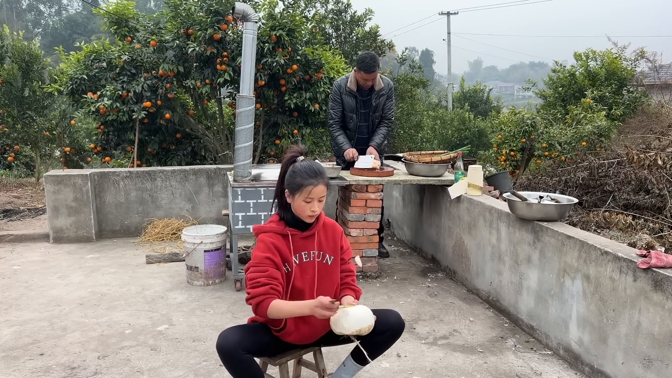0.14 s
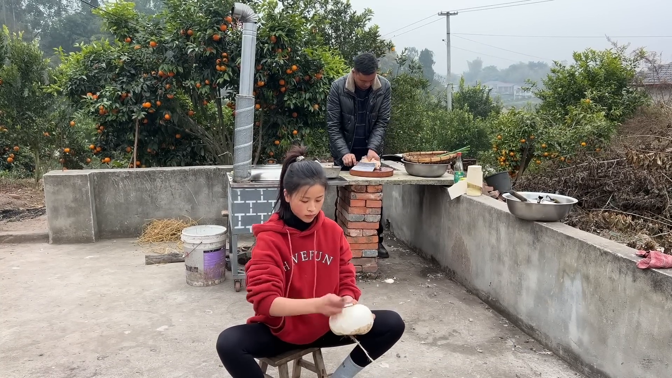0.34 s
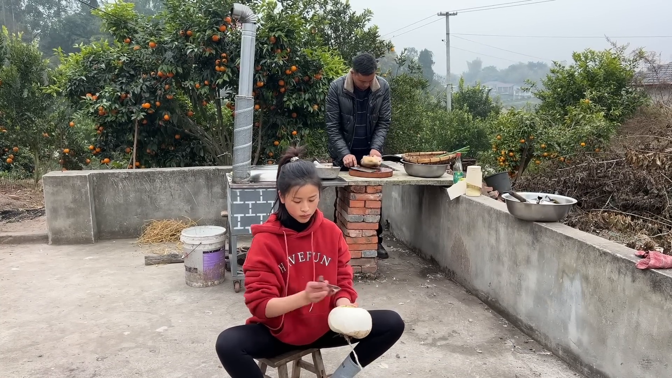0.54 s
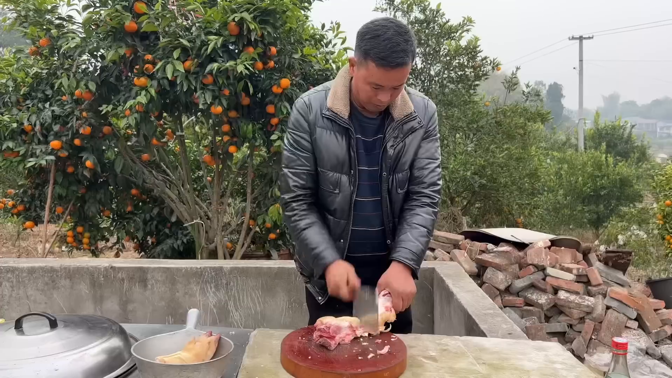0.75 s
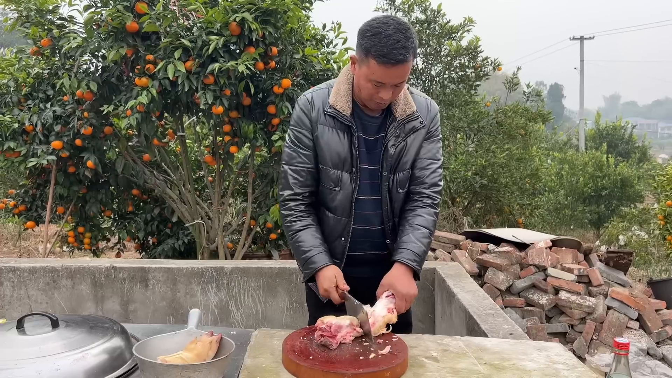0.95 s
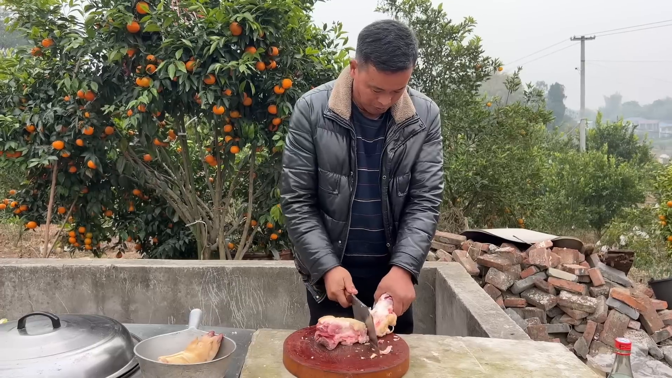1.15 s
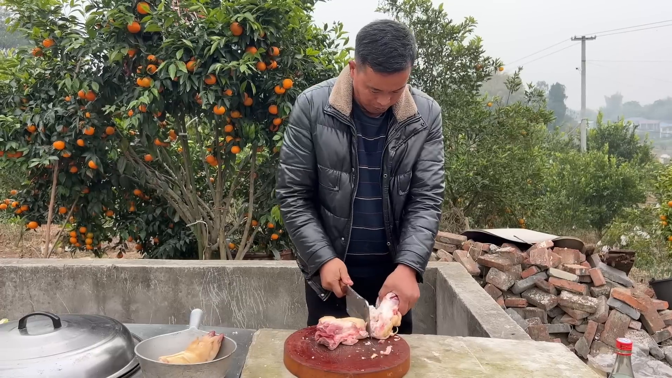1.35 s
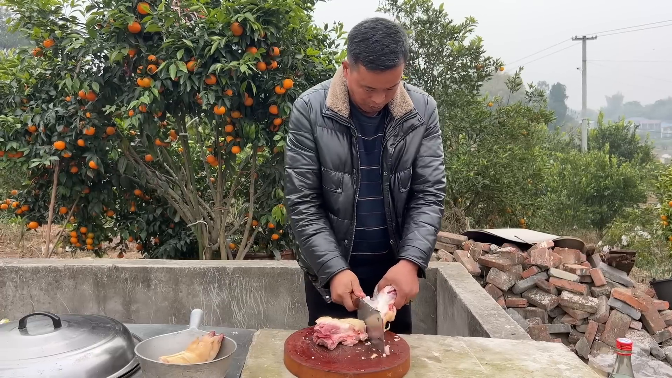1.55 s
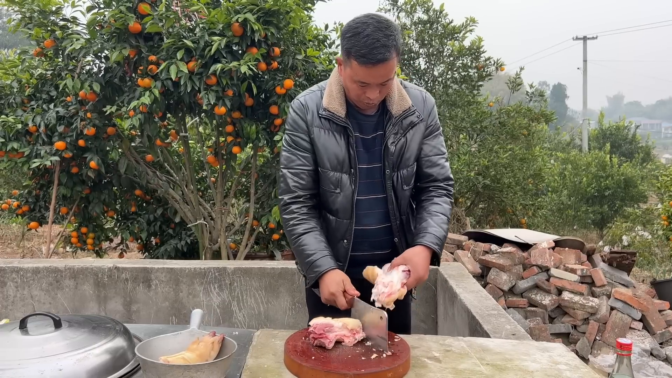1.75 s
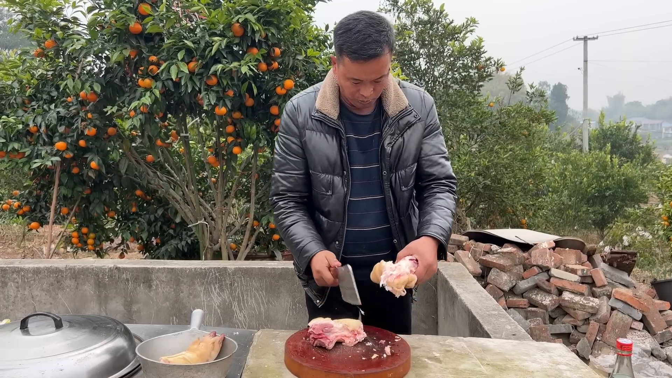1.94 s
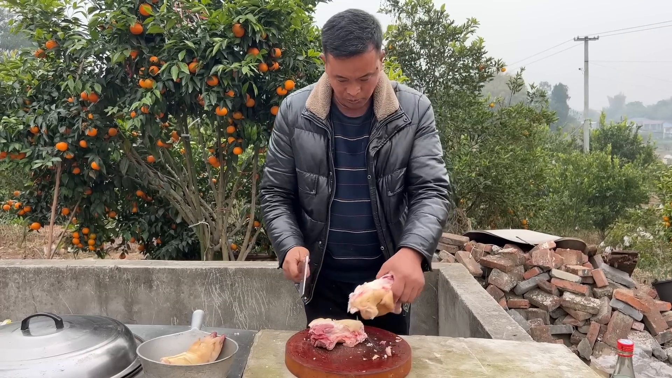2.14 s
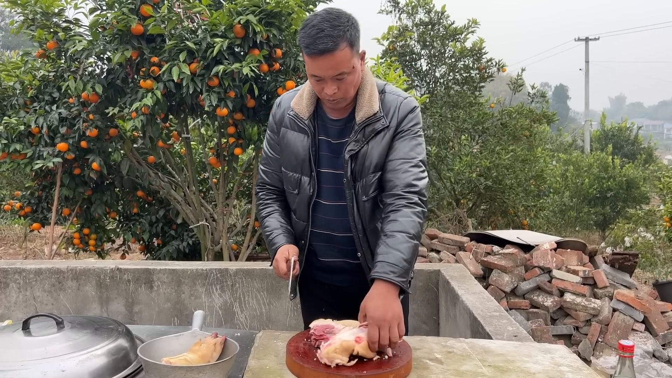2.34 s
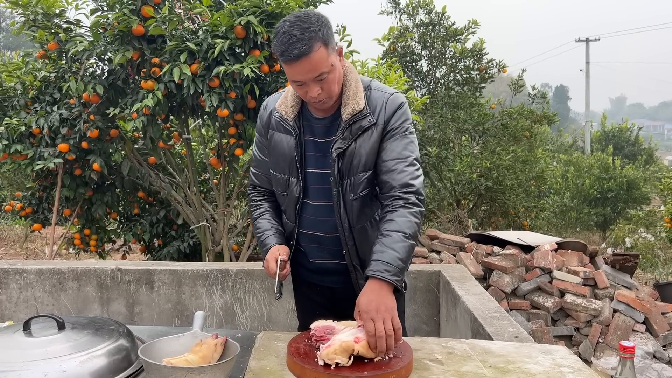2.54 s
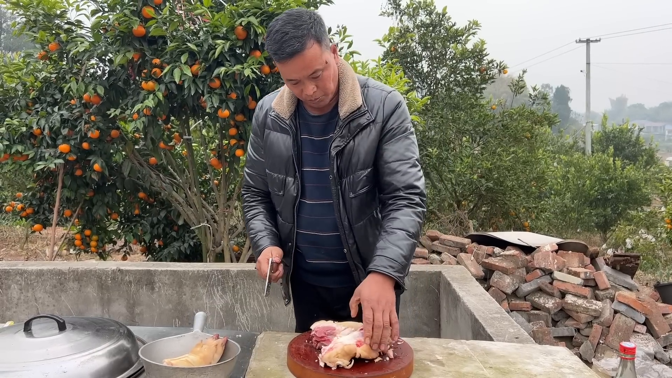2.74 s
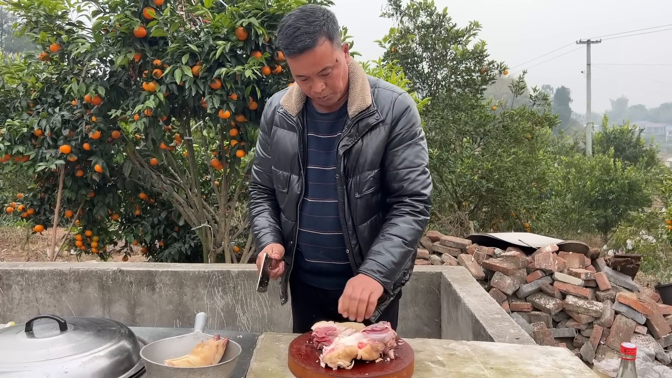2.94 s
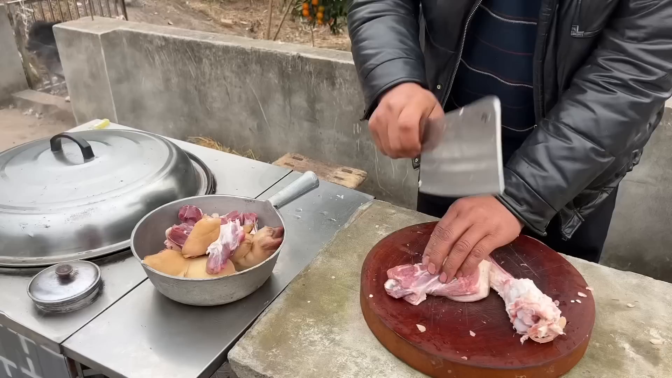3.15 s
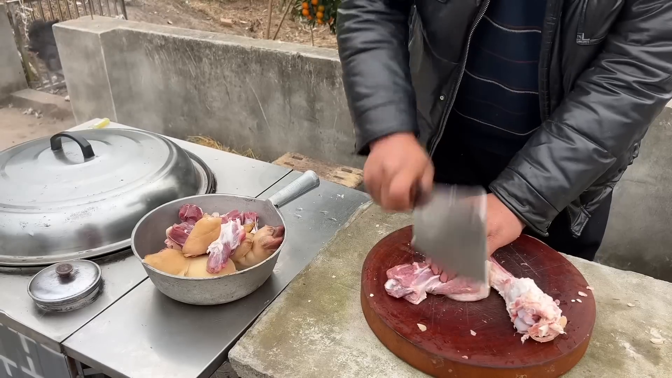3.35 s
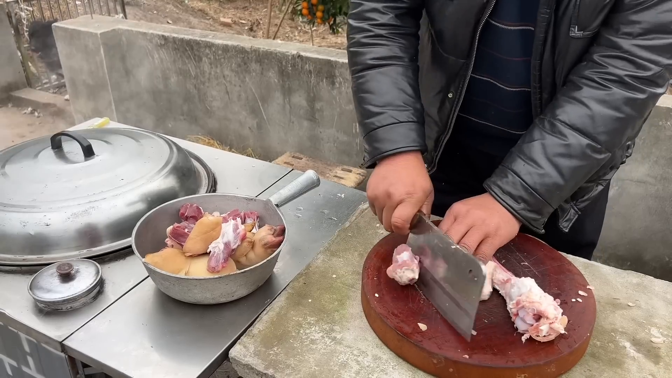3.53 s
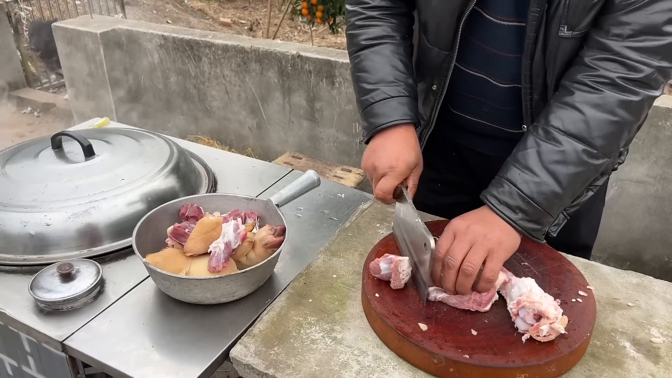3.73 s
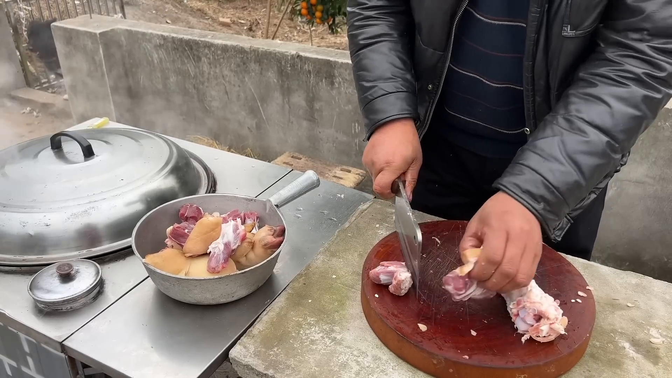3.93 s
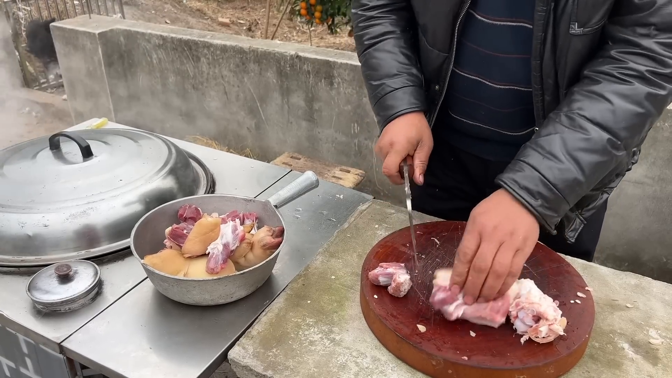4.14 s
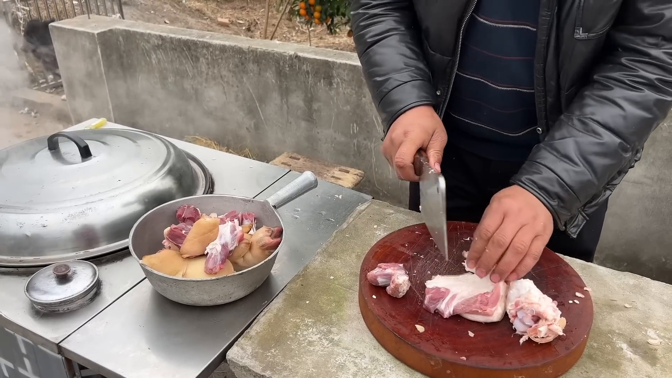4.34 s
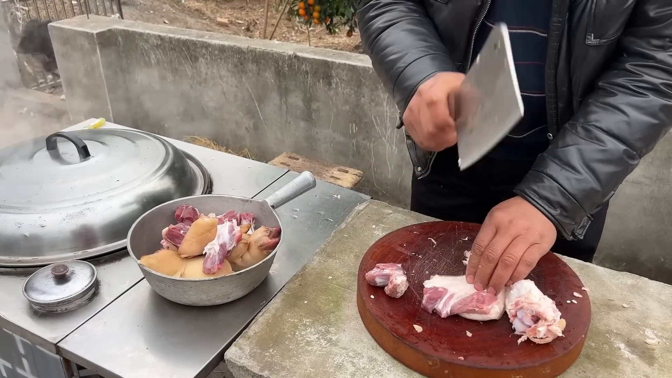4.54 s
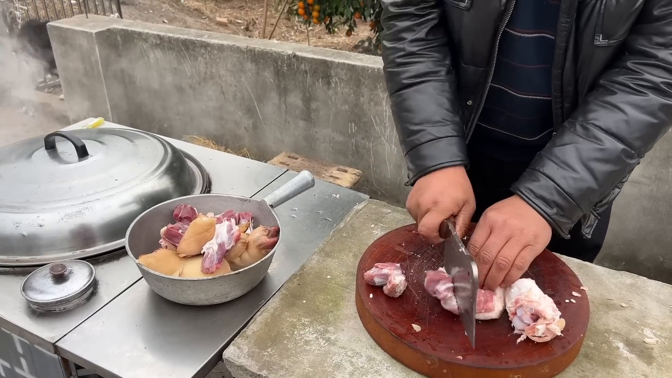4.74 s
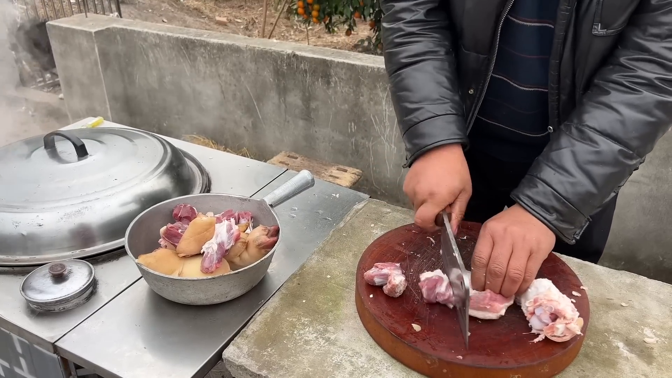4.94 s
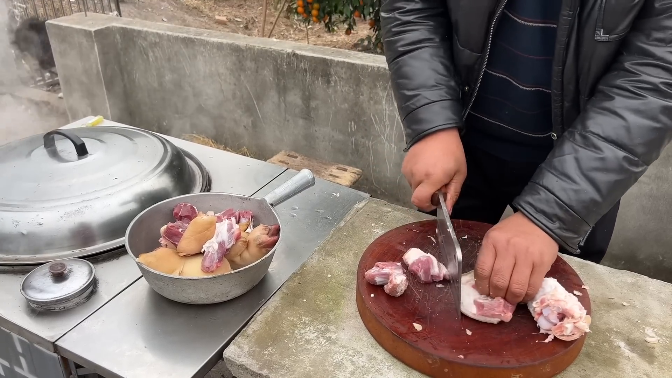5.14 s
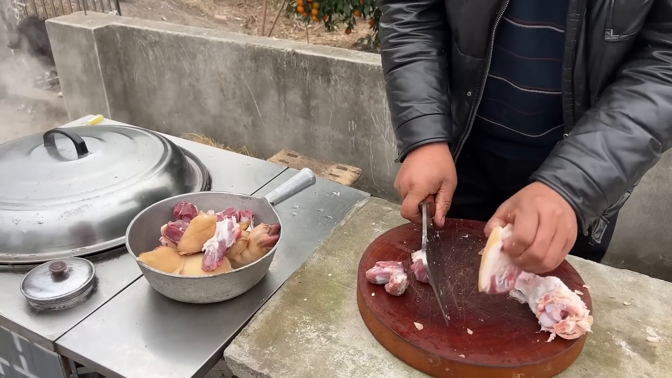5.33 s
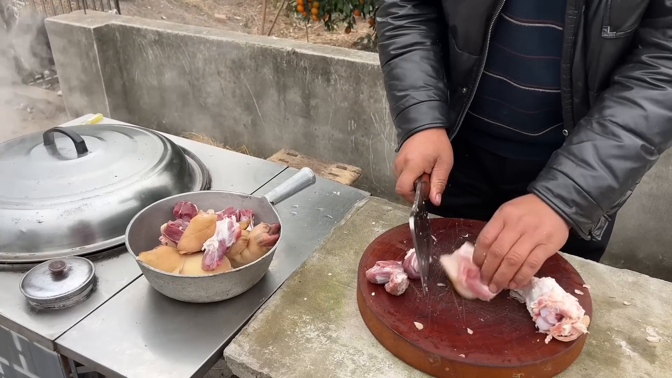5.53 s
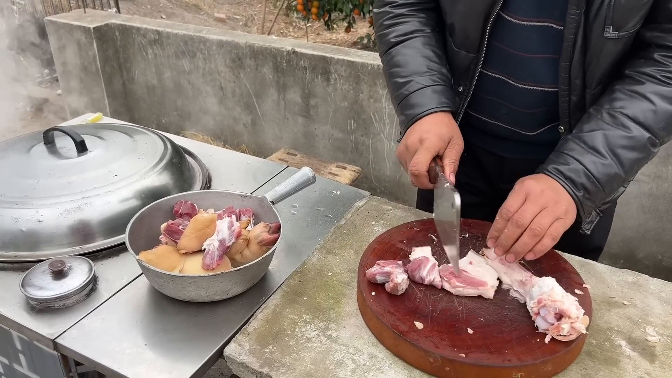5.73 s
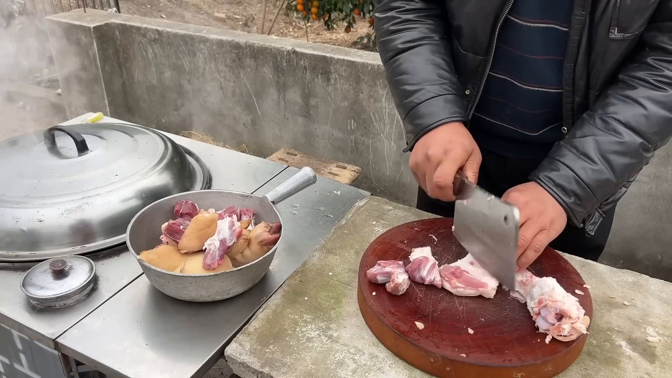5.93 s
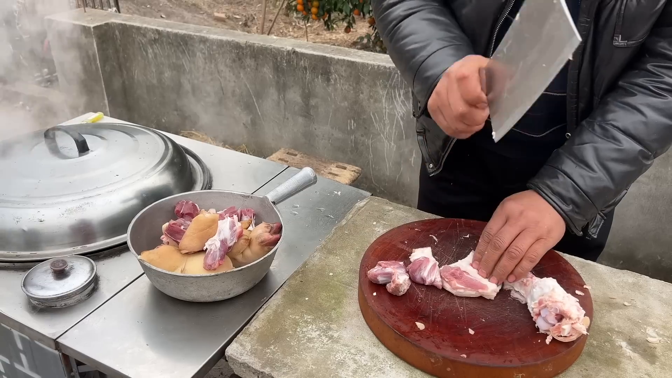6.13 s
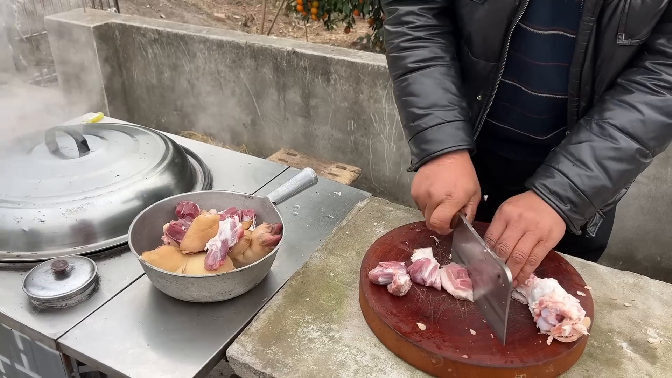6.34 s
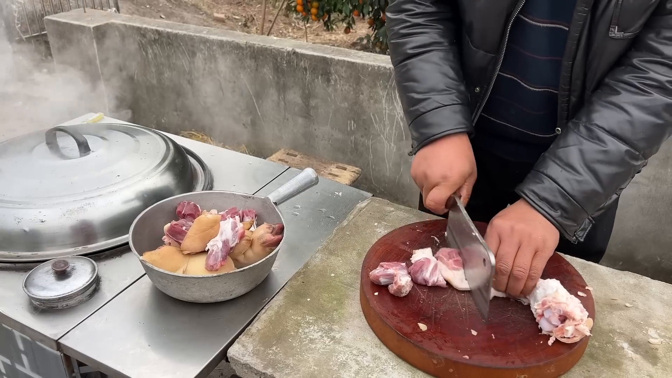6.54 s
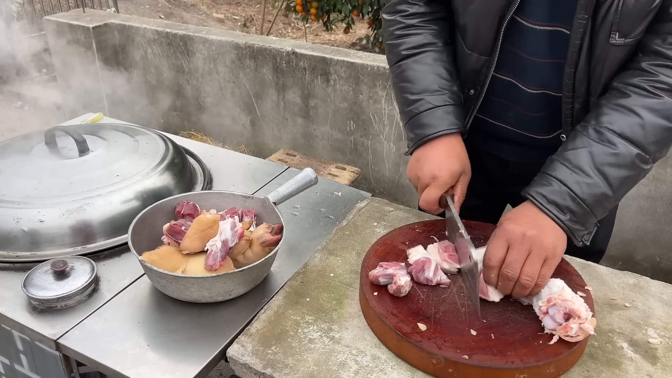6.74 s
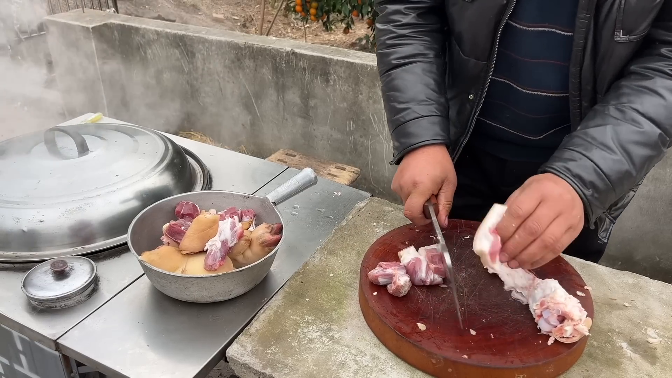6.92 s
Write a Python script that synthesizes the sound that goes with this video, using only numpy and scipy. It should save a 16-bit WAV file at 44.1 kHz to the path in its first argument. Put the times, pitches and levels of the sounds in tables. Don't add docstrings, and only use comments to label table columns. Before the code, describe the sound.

A walled yard outdoors, close stereo microphone, short scattered tail. From 0 to 0.73 s a low, wavering stove roar lies under thin, gritty paring strokes and small bright knife clinks; a far board knocks in quick bounces at 0.32, and a flat blade clatters loudly at 0.61 with fast, dry rebounds. An abrupt cut drops to quiet air. At 0.85 a cleaver cracks through bone: explosive, splintering, woody, with wet crunch and low table thump. Soft sleeve rustle and meat rubbing follow. A short high bird whistle falls at 2.29, just before a far weaker chop at 2.42. Another subtle cut comes at 3.2; the hardest, shortest blow lands at 3.43. A clear steel ping sounds at 4.12, a soft thud at 4.39, then full chops at 4.78, wetter, and 6.30. Faint squeaks, taps and rubbing continue to about 7 s.

```python
import sys
import numpy as np
from scipy import signal
from scipy.fft import rfft, irfft
from scipy.io import wavfile
from scipy.ndimage import uniform_filter1d

SR = 44100
rng = np.random.default_rng(int(sys.argv[2]) if len(sys.argv) > 2 else 0)


def materialize(psi):
    bounded = np.clip(np.atleast_2d(psi).T, -1, 1)
    quanta = np.round(bounded * 32767).astype(np.int16)
    wavfile.write(sys.argv[1], SR, quanta)


def ratio_of_db(decibels):
    return 10 ** (np.asarray(decibels, float) / 20)


N = 307818

# fade_out_end_s, fade_in_start_s
SCENE_CHANGES = [
    (.726, .744),
    (3.188, 3.205),
]

# start_s, level_db
STOVE_SPECTRUM = [(15, -61), (25, -25), (60, -7.5), (119, -10.5), (213, -4), (266, -6.5), (316, -19.5),
                  (444, -19), (519, -65), (1500, -60.5), (1950, -76), (3300, -120)]
STOVE_LEVEL = [
    (0.0, -43),
    (0.582, -44.5),
    (0.63, -40),
    (0.694, -45),
    (0.73, -45),
]
FLUE_HZ, FLUE_DB = 70, 2

# pitch_hz, density_db_per_hz
KNIFE_SPECTRUM = [(880, -55), (1500, -27), (2850, -18), (4850, 1), (5700, -8), (8860, -10), (9890, -53),
                  (11300, -5), (13900, -35), (15200, -8.5), (16000, -9), (16500, -38)]
# start_s, end_s, start_db, end_db
STROKES = [
    (0, 0.02, -44, -58),
    (0.075, 0.085, -55, -56),
    (0.117, 0.168, -78, -62),
    (0.17, 0.227, -52, -47.5),
    (0.388, 0.45, -54, -50),
    (0.464, 0.48, -51, -63),
    (0.606, 0.725, -48.5, -51),
]
# centre_s, half_width_s, level_db
CATCHES = [(0.018, .003, -46), (.085, 0.0024, -51.5), (.168, .002, -51), (0.1772, 0.0021, -34),
           (0.182, .001, -39), (.194, .0015, -43), (.2045, 0.0022, -45), (.215, 0.0026, -41),
           (0.226, 0.0018, -46), (.391, 0.0014, -37), (0.4, 0.0023, -32), (0.406, .002, -42),
           (.418, .002, -45), (0.431, 0.0016, -45), (.44, .003, -47), (.468, 0.0015, -49),
           (0.659, 0.0041, -34), (.721, 0.004, -39.5)]

# pitch_hz, level_db, t60_s
SMALL_KNIFE_MODES = [(3900, -12, .04), (4850, -1, .035), (5020, 0, .045), (6300, -9, .05), (7200, -14, .03),
                     (11300, -10, .03)]
FLAT_BLADE_MODES = [(1680, -14, .07), (1975, -6, .04), (2975, 1, .03), (3255, -8, .08), (3530, -6, .12),
                    (3955, 3, .16), (4278, -11, .2), (5030, -6, .14), (5510, -3, .1), (6250, -8, .03),
                    (6807, -9, .12), (7950, -3, .025)]
HELD_BLADE_MODES = [(1653, -3, .16), (1960, 0, .15), (2692, -20, .2), (3300, -6, .06), (3962, -20, .25),
                    (5039, -6, .32), (5523, -9, .28), (7311, -8, .05), (9044, -5, .12), (11340, -1, .1),
                    (12060, -4, .06), (12630, -6, .07)]
# pitch_hz, level_db, t60_s
BOARD_MODES = [(705, 0.5, 0.075), (1000, -1.5, 0.074), (1666, 0, .16), (2733, -8.5, 0.085),
               (3337, -2, 0.05), (3933, -2, 0.12)]
# pitch_hz, level_db
TICK_SPECTRUM = [(300, -11), (700, -6), (2000, -1), (5000, 4), (9000, -13.5), (10200, -26), (11500, -11.5),
                 (15000, -25.5)]
# start_s, level_db, dry_tick_db
CLINKS = [
    (0.0144, -26.5, -37),
    (0.0837, -39, -5),
    (0.1231, -49, -1),
    (0.1773, -33, -7),
    (0.2129, -36, -21),
    (0.2264, -31, -20),
    (0.396, -25.5, -11.5),
    (0.4672, -38.5, -11),
    (0.4855, -43.5, -13),
    (0.7195, -30, -10),
]
CLATTER = [
    (0.321, -30, -14),
    (0.6136, -7.5, -3.5),
    (.636, -17, 2.5),
    (0.6556, -22.5, 11.5),
    (0.668, -26.5, 12),
    (.688, -39, 13),
    (1.538, -47, -10),
    (1.574, -45, -5),
    (1.809, -50, -14.5),
]
PINGS = [
    (4.083, -58, -4),
    (4.1165, -28, -5),
    (4.224, -62, 0),
]
FAR_KNOCKS = [
    (.3165, -28.5, -4),
    (.327, -29.5, -3),
    (.339, -31, -5),
]

# start_s, peak_db, centre_hz, left_right_db
TAPS = [(0.2707, -44, 1740, 1), (0.3431, -35, 2750, 3.5), (1.2073, -51, 1640, 4), (2.0797, -42, 5200, 0),
        (2.374, -42, 3300, 2), (2.372, -48, 6200, 0), (2.91, -49, 2440, 9), (3.2185, -41, 926, 4),
        (3.5364, -46, 1290, 10), (4.4136, -49.5, 2880, 4.5), (4.4917, -45.5, 5530, .5),
        (4.6843, -52.5, 1720, 13.5), (4.862, -49, 1110, .5), (5.6, -52, 1900, 1.5),
        (6.5905, -50.5, 2930, -10.5), (6.9064, -49, 3640, 7)]
# start_s, peak_db, centre_hz, left_right_db
THUDS = [
    (1.213, -43, 440, 4.5),
    (2.902, -47, 338, 3),
    (4.335, -53, 186.5, .5),
    (4.393, -34, 330, 7.5),
    (5.2, -42, 192, 3.5),
    (5.454, -45, 506, 6.5),
    (6.925, -56, 277, 2),
]
# start_s,
# peak_db, centre_hz, left_right_db
GRIT = [(0.605, -34, 2800, 2.5), (.628, -34, 1300, 2), (.643, -23, 2220, 2), (.651, -32, 1000, 0),
        (.66, -16, 4900, -0.5), (0.671, -24, 3400, 2.5), (.681, -40, 1500, 1.5), (.692, -33, 2600, 2),
        (.702, -41.5, 1290, 2), (.711, -38, 2300, 2), (.315, -31.5, 905, 1), (.332, -35, 740, 0.5),
        (.318, -31, 2280, 1.5), (0.326, -37.5, 1500, 0.5), (0.342, -33.5, 2600, 2), (0.639, -19, 3600, 1)]
# start_s, peak_db, centre_hz, left_right_db
CLICKS = [(.92, -49, 5500, 0), (3.4495, -20, 900, 1), (3.512, -46, 2500, 2), (4.0615, -50, 6000, -2),
          (4.1168, -30, 8000, -1), (4.1168, -37, 15000, -1), (4.1175, -30, 3400, -1),
          (4.216, -41, 1900, -4), (4.2245, -45, 11500, -1), (4.227, -46, 3300, -2), (5.1968, -35, 1600, 8),
          (5.1968, -35, 2800, 8), (5.403, -50, 2600, 2), (5.617, -47, 1700, 1.5), (5.619, -52, 3800, 1),
          (6.036, -56, 7500, 0), (6.685, -55, 4500, 0)]
TAP_T60, THUD_T60, CLICK_T60 = .05, .1, .018

# pitch_hz, t60_s
YARD_DECAY = [(60, 0.37), (200, 0.59), (500, 0.31), (1000, 0.14), (2500, 0.14), (5000, 0.15), (10000, 0.08)]

# start_s, length_s, rustle_db, rubbing_db
MOVES = [(.76, .08, -62, -66), (.87, .15, -58, -52), (1.03, .1, -63, -60), (1.17, .1, -62, -54),
         (1.34, .11, -61, -61), (1.51, .1, -59, -43.5), (1.76, .05, -65, -64), (2.04, .12, -64, -65),
         (2.34, .26, -62, -61), (2.62, .15, -65, -64), (2.88, .08, -70, -59), (3.18, .24, -60, -60),
         (3.62, .15, -66, -70), (4.02, .24, -64, -66), (4.39, .13, -61, -63), (4.53, .23, -63, -65),
         (4.94, .53, -57.5, -60), (5.5, .125, -60, -60), (5.68, .42, -70, -70), (6.13, .14, -62, -70),
         (6.5, .16, -59, -59), (6.71, .16, -63, -63), (6.88, .06, -55, -56)]
RISE_S, RELEASE_DB_PER_S, WAVER_DB = 0.054, 220.5, 2
RUMBLE_DB, RUMBLE_TOP_DB = -9.5, -60.5
# rustle_db, rubbing_db, rumble_db
REST_DB = (-74, -78, -68)
# rustle_db, rubbing_db, rumble_db
TOUCH_DB = (-56, -41, -55.5)
TOUCH_S = 0.013
# rustle_db, rubbing_db, rumble_db
SHUDDER_DB = (-46, -31, -24)
SHUDDER_S, SHUDDER_DB_PER_S = 0.052, 93.5
# pitch_hz, density_db_per_hz
RUSTLE_SPECTRUM = [(710, -34), (1200, -6.5), (1940, 0.5), (6860, -4.5), (9230, -11.5), (10200, -32.5),
                   (11400, -13.5), (13000, -20.5), (13700, -38), (15300, -12), (16500, -35.5)]
RUMBLE_SPECTRUM = [(15, -33.5), (25, -7), (53, 5.5), (102, -7), (139, -13.5), (194, -21), (300, -17),
                   (390, -39), (660, -120)]
# pitch_hz, level_db, t60_s
RUBBED_MODES = [(202, -0.5, 0.022), (300, 3, .018), (450, 3.5, .022), (620, -1.5, 0.011), (780, -2, 0.0096),
                (970, 0.5, .022), (1310, -4, .015), (1620, -2.5, .018), (2150, -6.5, .013),
                (2700, -5.5, .016), (3200, -11, .013), (4900, -13, .015), (5550, -14.5, .02)]
# centre_s, pitch_hz, level_db
SQUEAKS = [(.846, 2500, -47), (.94, 2750, -52), (.975, 1880, -54), (.975, 2600, -54), (1.21, 2700, -59),
           (1.22, 1650, -56), (1.397, 5960, -60), (1.555, 5550, -59), (2.375, 2000, -60),
           (2.376, 3020, -56), (2.378, 3450, -55), (2.411, 1650, -52), (2.51, 2750, -61), (2.7, 2900, -65),
           (3.68, 2050, -63), (3.696, 3440, -66), (3.76, 3040, -63), (4.098, 3960, -62), (4.52, 520, -61),
           (4.776, 3900, -56), (4.78, 1350, -43), (5.038, 5580, -62), (5.24, 1950, -59), (5.352, 3250, -59),
           (5.405, 480, -58), (5.435, 490, -60), (5.53, 460, -62), (5.585, 470, -61), (5.612, 490, -59),
           (6.292, 3100, -51), (6.294, 1400, -48), (6.543, 4750, -59), (6.545, 6100, -61),
           (6.605, 2980, -57), (6.618, 1980, -59), (6.77, 980, -62), (6.78, 1918, -62), (6.92, 940, -55),
           (6.92, 5600, -60), (6.94, 3950, -56), (6.942, 2650, -56)]
SQUEAK_S = .045

# start_s, force_db, splintering_s, flesh_crunch_db, table_thump_db
BLOWS = [
    (0.85, .5, .012, -29, -15),
    (2.4164, -22.5, 0.019, -34.5, -14),
    (3.433, 1.5, .0085, -24, -20),
    (4.7842, -0.5, .011, -20.5, -13),
    (6.301, 0.5, 0.01, -25.5, -14),
]
# pitch_hz, density_db_per_hz
BONE_SPECTRUM = [(120, -38), (250, -11), (700, -7), (1600, -8), (2700, -12.5), (4000, -24.5), (5600, -39),
                 (14000, -62)]
# pitch_hz, level_db
BONES = [
    (-0.16, [(430, -4), (690, -9), (900, 1), (1310, 8), (1700, 5.5), (1950, -8.5), (2700, 4), (2950, -10.5), (3250, 2.5), (3900, -17.5), (4700, 12)]),
    (-2.1, [(470, 6), (700, -9), (950, 5.5), (1220, 7.5), (1450, -3), (1700, 10), (2230, 3), (2600, -4), (3000, -4), (3500, -2), (4200, -8)]),
    (-.5, [(280, 9), (350, 4), (730, 4), (810, 6.5), (950, -2.5), (1180, -5.5), (1550, 2), (1730, -13), (2450, 6.5), (2750, -11.5), (3270, 6), (3550, -6.5), (3900, 7.5)]),
    (-1, [(260, -8), (305, -8), (400, 4.5), (700, -3.5), (1500, -3), (970, 3), (1150, -7.5), (1700, -8.5), (2050, 5), (2550, -7.5), (2950, 6), (3500, -8), (3950, 4), (4300, -6.5)]),
    (-0.66, [(420, 4), (780, 3.5), (1150, -4.5), (1310, -2.5), (1510, 0), (1750, -6.5), (2080, 5.5), (2600, -4.5), (2900, -5.5), (3500, -16), (3990, 3.5), (4500, -6.5)]),
]
RESONANCE_OCTAVES = 0.066
# delay_s, level_db
SECOND_CRACKS = [
    (.009, -12),
    (.012, -4),
    (.006, 0),
    (.011, -16),
    (.011, -7),
]
SECOND_S = 0.0013
FLESH_LEADS = [.0055, .004, .0075, .0045, .005]
BLOCK_FREEDOM = [1.5, 1.5, -3, 0, 0.5]
# pitch_hz, level_db, t60_s
BLOCK_MODES = [(310, -4, .08), (450, 0, 0.1), (605, -3, 0.058), (722, -6, 0.057), (812, -6.5, 0.068),
               (963, 3.5, 0.08), (1083, -8, 0.051), (1301, -6.5, 0.055), (1505, -4, .05),
               (1725, -2.5, 0.034), (1910, -3, 0.04), (2110, -7, .05), (2360, -5, .055), (2720, -7.5, 0.1),
               (3040, -9, 0.043), (3250, -9.5, 0.038)]
TABLE_MODES = [(55, -25, 0.2), (75, -14, 0.22), (110, 1.5, 0.13), (147, 5.5, .15), (190, 4.5, 0.17)]
BLOCK_DB, LIGHT_RING = -30.5, .15
DENSE_DB, DENSE_T60 = -14, .1
# pitch_hz, level_db
FLESH_SPECTRUM = [(600, -10.5), (1500, -6), (3500, -3.5), (8000, -5), (10300, -11), (11600, -2.5),
                  (13500, -14), (16000, -19.5)]
SPRAY_DB, SPRAY_DB_PER_S = -21.5, 200

# start_s, length_s, from_hz, to_hz, level_db
CHIRP = (2.289, .058, 7600, 7280, -37)
CHIRP_ECHO_DB, CHIRP_ECHO_T60 = -13, .4

# pitch_hz, density_db_per_hz
AIR_SPECTRUM = [(15, -34.5), (25, 0.5), (70, -5), (457, -7.5), (1150, -15), (1550, -13.5), (1980, -22.5),
                (6380, -20.5), (9080, -29.5), (10100, -53), (11600, -35), (13600, -55.5), (16500, -70)]
AIR_DB = -64.5
# pitch_hz, correlation
LIKENESS = [(60, 1), (180, 0.66), (550, 0.15), (1650, -0.15), (4970, -0.24), (15000, 0.79)]
# pitch_hz, level_db
HOUSING = [(8600, 0), (9400, -2), (10200, -6), (11000, 0.5), (12900, 0), (13800, -13), (14600, 0.5),
           (15800, -0.5)]


def evened(x):
    return x / np.sqrt(np.mean(x ** 2) + 1e-20)


def read(points, hz):
    f, value = np.transpose(points)
    return np.interp(np.log(hz + 1), np.log(f + 1), value)


def level(rows):
    return ratio_of_db(np.interp(np.arange(N) / SR, *np.transpose(rows)))


def add(mix, s, sound, pan_db=0., lag=0):
    era = int(s > SCENE_CHANGES[0][0])
    for side, shift, sign in ((0, 0, 0.62), (1, lag, -1.1)):
        part = mix[era, side, round(s * SR) + shift:][:len(sound)]
        part += ratio_of_db(sign * pan_db / 2) * sound[:len(part)]


def colour(points, size=2048):
    hz = abs(np.fft.fftfreq(size, 1 / SR))
    log_gain = np.log(ratio_of_db(np.maximum(read(points, hz), -90)))
    taps = np.fft.ifft(np.exp(np.conj(signal.hilbert(log_gain)))).real[:size // 2]
    return taps / np.linalg.norm(taps)


def ring(modes, spread_db, detune, size=13000):
    t = np.arange(size) / SR
    out = np.zeros(size)
    for hz, db, t60 in modes:
        strike, shift = rng.standard_normal(2)
        decay = ratio_of_db(db + spread_db * strike - 60 * t / abs(t60))
        out += decay * np.sin(2 * np.pi * hz * (1 + detune * shift) * t)
    return out / abs(out).max()


def noise(points, patchy_db, size=512, apart=1.):
    hz = np.fft.rfftfreq(size, 1 / SR)
    a, b, c, d, patches = rng.standard_normal((N * 4 // size + 5, len(hz), 5)).T
    patches = uniform_filter1d(patches, size=6, axis=0)
    patches = evened(uniform_filter1d(patches, size=10, axis=1))
    same = np.clip(1 - apart * (1 - read(LIKENESS, hz)), -1, 1)[:, None]
    left = a + 1j * b
    right = same * left + np.sqrt(1 - same ** 2) * (c + 1j * d)
    z = np.array([left, right]) * ratio_of_db(read(points, hz)[:, None] + patchy_db * patches)
    return evened(signal.istft(z, nperseg=size, noverlap=size * 3 // 4)[1][:, :N])


def stove():
    drift = evened(uniform_filter1d(rng.standard_normal(N), size=4000))
    tone = np.sin(2 * np.pi * np.cumsum(FLUE_HZ + 3 * drift) / SR)
    return noise(STOVE_SPECTRUM, 2.2, size=2048, apart=.15) + ratio_of_db(FLUE_DB) * tone


def paring():
    t = np.arange(N) / SR
    gain, catches = np.zeros(N), np.zeros(N)
    for a, b, a_db, b_db in STROKES:
        edges = np.interp(t, [a - .004, a, b, b + 0.0081], [0, 1, 1, 0])
        gain += ratio_of_db(np.interp(t, [a, b], [a_db, b_db])) * edges
    for s, width, db in CATCHES:
        catches += ratio_of_db(db) * np.exp(-.5 * ((t - s) / width) ** 2)
    grit = ratio_of_db(2 * evened(uniform_filter1d(rng.standard_normal(N), size=120)))
    return (gain * grit + catches + ratio_of_db(-68)) * noise(KNIFE_SPECTRUM, 3, size=256, apart=.35)


def struck_body(mix, knocks, modes, pan_db, spread_db):
    t = np.arange(1500) / SR
    for s, db, tick_db in knocks:
        body = ring(modes, spread_db, 0)
        onset = np.clip(np.arange(len(body)) / SR / .0008, 0, 1)
        add(mix, s, ratio_of_db(db) * body * onset, pan_db)
        tick = rng.standard_normal(1500) * ratio_of_db(-60 * t / 0.045) * np.clip(t / 0.003, 0, 1)
        add(mix, s, ratio_of_db(db + tick_db - 6) * np.convolve(tick, colour(TICK_SPECTRUM)), pan_db, lag=-5)


def taps(mix, rows, sharpness, rise, t60):
    t = np.arange(5000) / SR
    for s, db, hz, pan_db in rows:
        puff = rng.standard_normal(5000) * ratio_of_db(-60 * t / t60) * np.clip(t / rise, 0, 1)
        peak = signal.iirpeak(hz, sharpness, SR)
        knock = signal.lfilter(*peak, signal.lfilter(*peak, puff))
        add(mix, s - rise / 2, ratio_of_db(db) * knock / abs(knock).max(), pan_db, lag=round(3 * pan_db))


def yard(x):
    echo = np.zeros((2, SR))
    at = np.arange(300, SR - 20, 20) + rng.integers(0, 20, (2, (SR - 301) // 20))
    np.put_along_axis(echo, at, rng.choice([-1., 1.], at.shape), 1)
    hz, t, z = signal.stft(echo, SR, nperseg=512)
    decay = ratio_of_db(-60 * t / read(YARD_DECAY, hz)[:, None])
    tail = signal.istft(z * decay, SR, nperseg=512)[1]
    return signal.fftconvolve(x, tail / np.linalg.norm(tail[0]), axes=1)[:, :N]


def swell(t, s, rise, length, fall_db):
    return np.clip((t - s) / rise, 0, 1) * ratio_of_db(-fall_db * np.maximum(t - s - length, 0))


def handling():
    t = np.arange(0, N / SR + .01, .002)
    power = ratio_of_db(np.array(REST_DB))[:, None] ** 2 * np.ones(len(t))
    for s, length, rustle_db, rub_db in MOVES:
        rumble_db = min(rub_db, RUMBLE_TOP_DB) + RUMBLE_DB
        levels = ratio_of_db(np.array([[rustle_db], [rub_db], [rumble_db]]))
        power = power + (levels * swell(t, s, RISE_S, length, RELEASE_DB_PER_S)) ** 2
    waver = uniform_filter1d(rng.standard_normal(power.shape), size=14)
    waver = evened(uniform_filter1d(waver, size=14))
    power = power * ratio_of_db(2 * WAVER_DB * waver)
    for s, force_db, _, _, thump_db in BLOWS:
        levels = ratio_of_db(force_db + thump_db + np.array(SHUDDER_DB))[:, None]
        power = power + (levels * swell(t, s, SHUDDER_S, SHUDDER_S, SHUDDER_DB_PER_S)) ** 2
        levels = ratio_of_db(force_db + np.array(TOUCH_DB))[:, None]
        power = power + (levels * swell(t, s - TOUCH_S, TOUCH_S, TOUCH_S, RELEASE_DB_PER_S)) ** 2
    return [np.interp(np.arange(N) / SR, t, np.sqrt(p)) for p in power]


def creaks():
    out = np.zeros((2, N + 4000))
    for at, pitch, length, size, side in rng.random((1600, 5)):
        hz = 1400 * 6.5 ** pitch
        t = np.arange(round(500 + 1800 * length)) / SR
        gain = np.sqrt(hz) * ratio_of_db(read(RUSTLE_SPECTRUM, hz) - 1.8 * np.log(size + .1))
        grain = gain * np.sin(2 * np.pi * hz * t) * np.hanning(len(t))
        out[:, int(at * N):][:, :len(t)] += grain * np.sqrt([[side], [1 - side]])
    return evened(out[:, :N])


def rubbing():
    sizes = ratio_of_db(4 * np.minimum(rng.exponential(1, N), 3))
    slips = rng.standard_normal((2, N)) * sizes * (rng.random(N) < .07)
    slips[1] = 0.39 * slips[0] + .55 * slips[1]
    body = ring(RUBBED_MODES, 0, 0, size=4000)
    return evened(signal.oaconvolve(slips, body[None], axes=1)[:, :N])


def squeaks(mix):
    size = round(SQUEAK_S * SR)
    for s, hz, db in SQUEAKS:
        peak = signal.iirpeak(hz, min(28, hz / 70), SR)
        fuzz = evened(signal.lfilter(*peak, rng.standard_normal(6000))[1500:])
        add(mix, s - SQUEAK_S / 2, ratio_of_db(db) * fuzz[:size] * np.hanning(size))


def bone_colour(tilt_db, peaks):
    hz = np.geomspace(100, 16000, num=400)
    db = read(BONE_SPECTRUM, hz) + tilt_db * np.log2(hz / 1000)
    for peak_hz, peak_db in peaks:
        db = db + peak_db * np.exp(-.5 * (np.log2(hz / peak_hz) / RESONANCE_OCTAVES) ** 2)
    return colour(np.transpose([hz, db]))


def blow(mix, row, bone, second, ring_db, lead):
    s, force_db, span, crunch_db, thump_db = row
    t, draw = np.arange(2048) / SR, rng.random((2048, 2))
    burst = np.clip(t / 0.0012, .55, 1) * ratio_of_db(-7 * (t / span) ** 1.6)
    burst = burst + ratio_of_db(second[1]) * np.exp(-.5 * ((t - second[0]) / SECOND_S) ** 2)
    cracks = rfft((draw[:, 0] < .07) * (2 * draw[:, 1] - 1) * burst)
    cracks = irfft(cracks / abs(cracks) ** .75) * np.sqrt(burst)
    cracks /= np.sqrt(np.sum(cracks ** 2) / (span * SR))
    snap = 0.38 * np.convolve(cracks, bone_colour(*bone))
    snap = signal.lfilter(*signal.butter(2, 300, "high", fs=SR), snap)
    dull = signal.filtfilt(*signal.butter(2, 1700, fs=SR), snap)
    bright = (snap - dull) * ratio_of_db(6.5 - 9 * np.arange(len(snap)) / SR / span)
    wood_db = BLOCK_DB + ring_db - LIGHT_RING * force_db
    wood = ratio_of_db(wood_db) * signal.fftconvolve(snap, ring(BLOCK_MODES, 3, .004))
    dense = (draw[:, 0] - .5) * ratio_of_db(-60 * t / DENSE_T60) * np.clip(t / .004, 0, 1)
    dense = np.convolve(snap, dense / np.linalg.norm(dense))

    u = np.arange(1500) / SR - lead
    spray = ratio_of_db(SPRAY_DB - SPRAY_DB_PER_S * u)
    spray = spray * np.clip(u / .006, 0, 1) * np.clip((u[-1] - u) / .008, 0, 1)
    cut = np.clip(1 + u / lead, .2, 1) * ratio_of_db(-np.maximum(u - .001, 0) * 3000)
    crunch = np.convolve(rng.standard_normal(1500) * (cut + spray), colour(FLESH_SPECTRUM))
    push = np.hanning(200)
    thump = np.convolve(ring(TABLE_MODES, 0.88, 0.0091), push / push.sum())

    add(mix, s, ratio_of_db(force_db + DENSE_DB) * dense, 1.5, lag=6)
    add(mix, s, ratio_of_db(force_db) * dull, .6, lag=6)
    add(mix, s, ratio_of_db(force_db) * bright, -4, lag=3)
    add(mix, s, ratio_of_db(force_db) * wood, 1.2, lag=6)
    add(mix, s - lead, ratio_of_db(force_db + crunch_db) * crunch, -2, lag=6)
    add(mix, s + 0.0016, ratio_of_db(force_db + thump_db) * thump, 1.2)


def bird(mix):
    s, length, from_hz, to_hz, db = CHIRP
    t = np.arange(6500) / SR
    u = np.clip(t / length, 0, 1)
    echo = u ** 2 * ratio_of_db(CHIRP_ECHO_DB - 60 * t / CHIRP_ECHO_T60)
    shape = np.sin(np.pi * u) ** 2 + echo
    hz = to_hz + (from_hz - to_hz) * (1 - u) ** 1.63
    tone = np.sqrt(2) * ratio_of_db(db) * shape * np.sin(2 * np.pi * np.cumsum(hz) / SR)
    add(mix, s, tone * signal.windows.tukey(len(t), .1), 8, lag=9)


def scene():
    knocks = np.zeros((2, 2, N))
    struck_body(knocks, CLINKS, SMALL_KNIFE_MODES, 2.5, 2.5)
    struck_body(knocks, FAR_KNOCKS, BOARD_MODES, 1.5, 4)
    struck_body(knocks, CLATTER, FLAT_BLADE_MODES, 1.5, 2.5)
    struck_body(knocks, PINGS, HELD_BLADE_MODES, -1, .8)
    taps(knocks, TAPS, 1.1, .002, TAP_T60)
    taps(knocks, GRIT, 1.4, .002, TAP_T60)
    taps(knocks, CLICKS, 0.74, .001, CLICK_T60)
    taps(knocks, THUDS, 1.1, 0.0028, THUD_T60)
    squeaks(knocks)
    for row, *piece in zip(BLOWS, BONES, SECOND_CRACKS, BLOCK_FREEDOM, FLESH_LEADS):
        blow(knocks, row, *piece)
    bird(knocks)

    near = paring() + level(STOVE_LEVEL) * stove() + knocks[0] + ratio_of_db(-12) * yard(knocks[0])
    rustle, rub, rumble = handling()
    hands = rustle * (.9 * noise(RUSTLE_SPECTRUM, 3, size=512) + .35 * creaks())
    hands += rub * rubbing()
    hands += rumble * noise(RUMBLE_SPECTRUM, 2.5, size=2048)
    later = hands + knocks[1] + ratio_of_db(-21.5) * yard(knocks[1])
    first = np.arange(N) / SR < np.mean(SCENE_CHANGES[0])
    return np.where(first, near, later) + ratio_of_db(AIR_DB) * noise(AIR_SPECTRUM, 3, size=1024)


def top_cut(x):
    return signal.sosfilt(signal.butter(12, 17100, fs=SR, output="sos"), x)


def record(dry):
    t, gain = np.arange(N) / SR, np.ones(N)
    for end, start in SCENE_CHANGES:
        gain *= np.interp(t, [end - .004, end, start, start + 0.0035], [0.99, 0.015, 0.017, 1.0])
    high_passed = signal.sosfilt(signal.butter(4, 52, "high", fs=SR, output="sos"), dry)
    limited = 0.98 * np.tanh(high_passed * gain / 1.002)
    hz = np.fft.rfftfreq(N, 1 / SR)
    response_db = read(HOUSING, hz) - np.clip((hz - 15820) / 4, 0, 45)
    finished = irfft(rfft(limited) * ratio_of_db(response_db), N)
    return top_cut(finished)


dry = scene()
out = record(dry)
materialize(out)
```